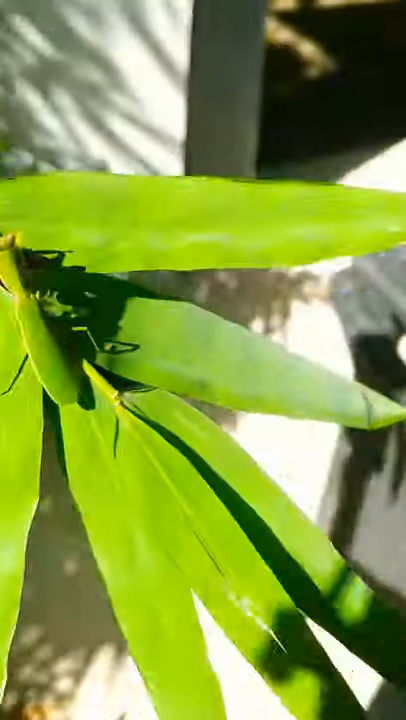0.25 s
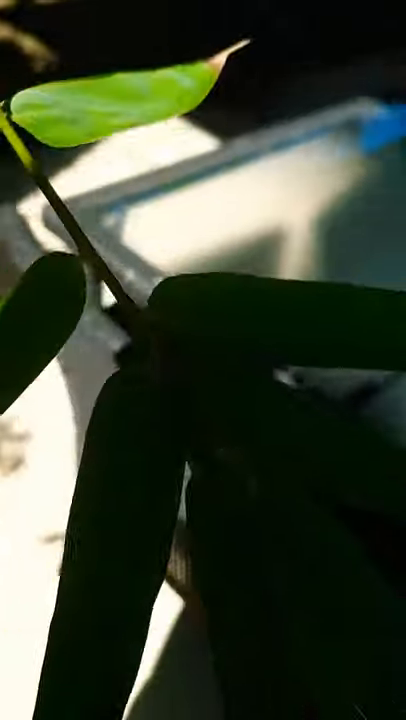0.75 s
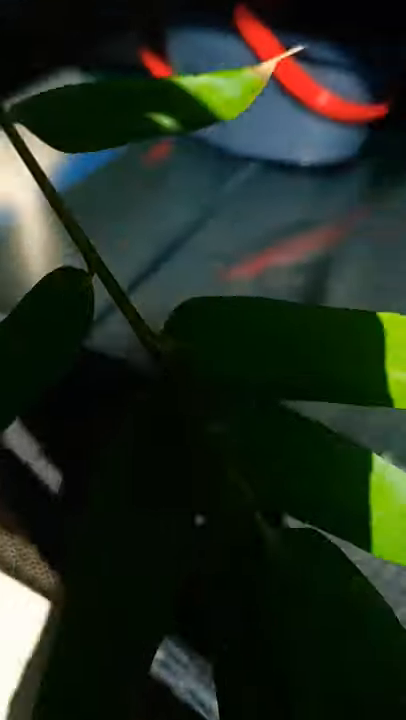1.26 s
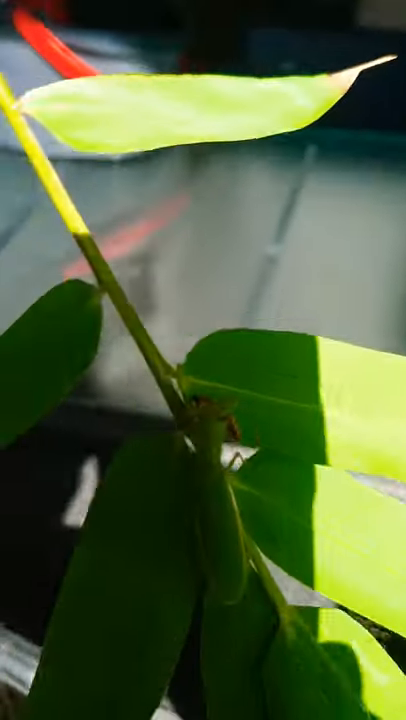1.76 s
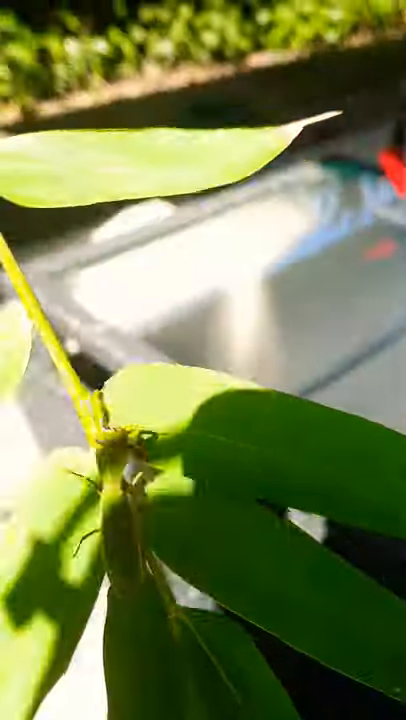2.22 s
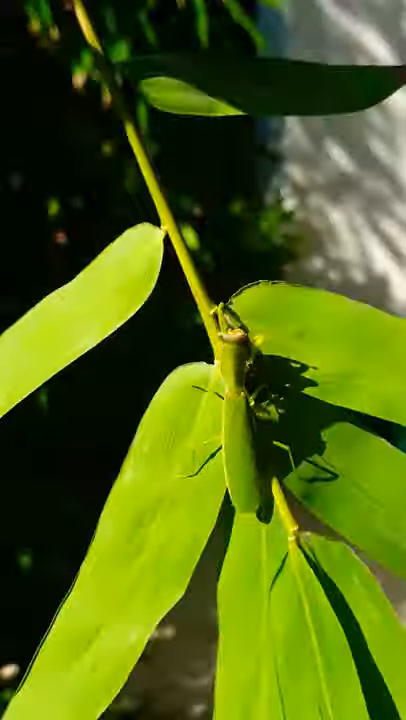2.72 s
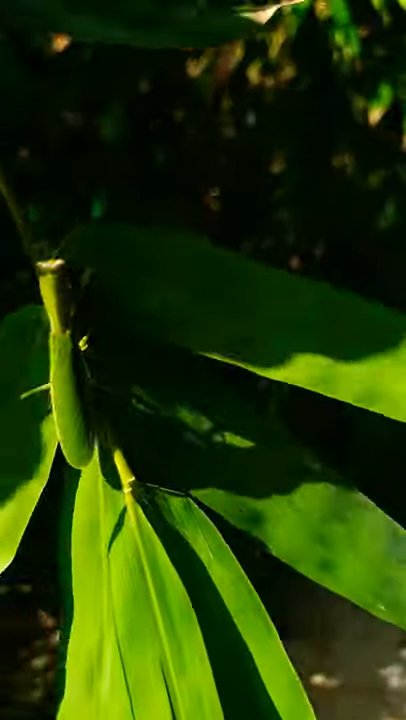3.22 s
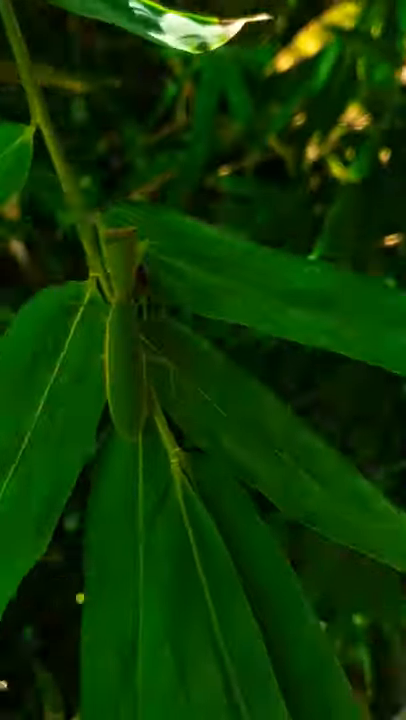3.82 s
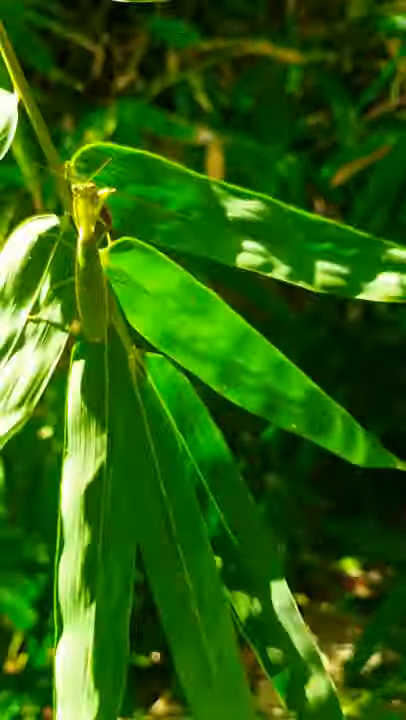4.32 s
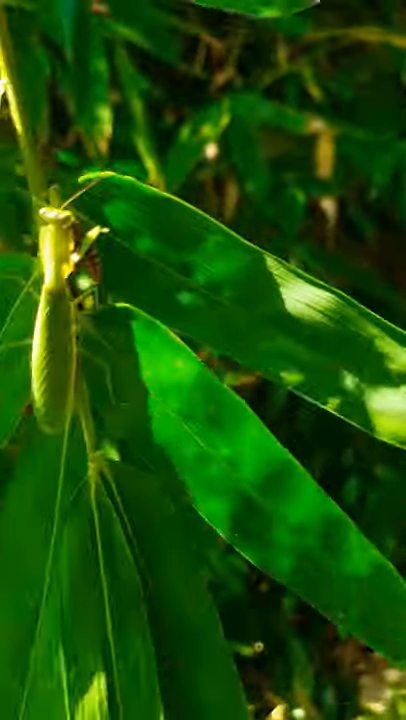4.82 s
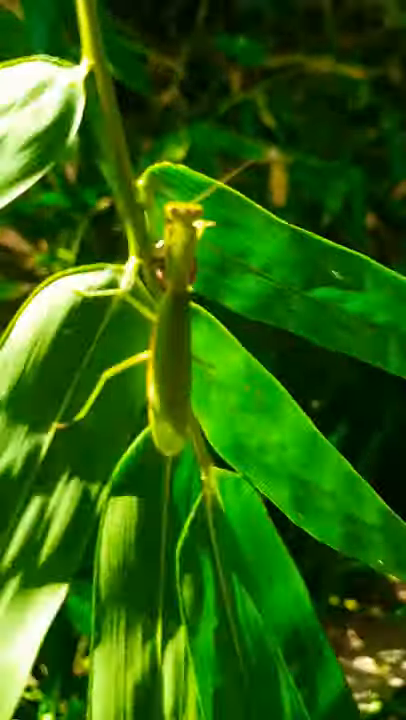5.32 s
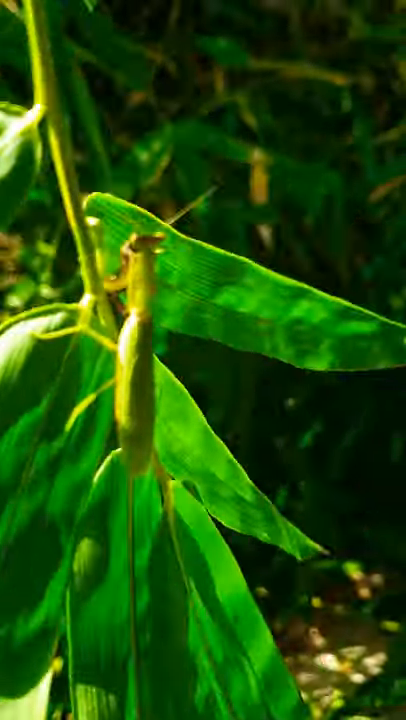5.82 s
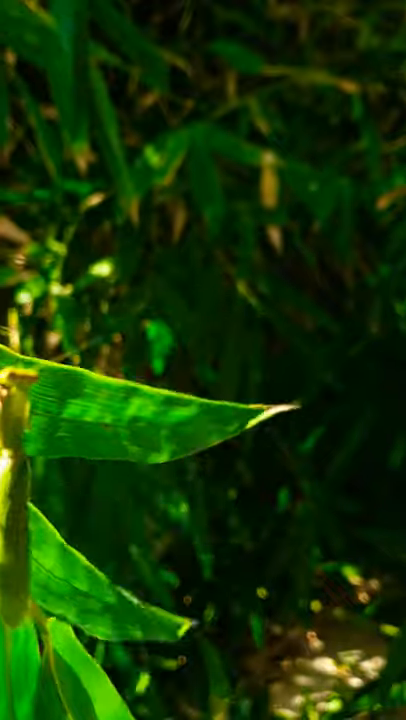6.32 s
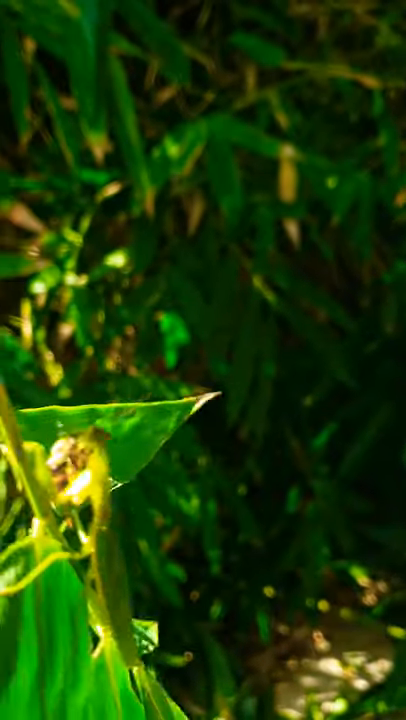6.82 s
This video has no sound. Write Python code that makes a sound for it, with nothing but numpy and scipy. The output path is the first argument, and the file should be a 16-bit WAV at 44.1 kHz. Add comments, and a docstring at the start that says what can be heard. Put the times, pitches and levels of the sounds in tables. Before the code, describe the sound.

Bamboo leaves rustle in gusts close to the microphone, mostly on the right, a bright, fluttering hiss with fine crackle and occasional swishes. The rustle swells at about 0.3 seconds, then in waves from 1 to 2.7 seconds. A sharp leaf flick and light stem knocks come around 1.2 seconds, with another knock at 1.8. From about 2.8 to 3.8 seconds there is a lull with small ticks. A crisp snap at 3.9 and soft knocks at 4.1 lead into another strong gust, peaking near 4.7. The leaves then settle, stirring lightly around 5.5 and growing very quiet by 6.5. One small dry tap on the device sounds on the left at 6.7. Throughout, wind rumbles softly on the microphone, puffing on the left near 2.6 and 3.6 seconds, while a faint, distant motor hums under the garden air.

```python
"""Bamboo leaves in gusts of wind

Gusts push bamboo leaves across each other beside a hand-held phone, nearest its right port.
Stick-slip friction makes the hiss; single blades swish, leaf tips flick and stems knock and ring.
Turbulence rumbles and puffs on the ports, and the case is tapped once.
A faint far-off motor hums under the garden air."""
import sys
import numpy as np
from scipy import signal
from scipy.fft import rfft, irfft, next_fast_len
from scipy.io import wavfile
from scipy.ndimage import map_coordinates

SR = 44100
rng = np.random.default_rng(int(sys.argv[2]) if len(sys.argv) > 2 else 0)


def to_wav(s):
    """Save 16-bit WAV."""
    ch = np.atleast_2d(s).T  # columns
    pcm = np.round(np.clip(ch, -1, 1) * 32767)  # PCM
    wavfile.write(sys.argv[1], SR, pcm.astype(np.int16))


N = 311257
T = np.arange(N) / SR


def leaves(left_lift_db=6):
    """Stick-slip friction: dense slips between blades merge into a fluttering hiss with sparse crackle."""
    # blade resonances: (frequency [Hz], bandwidth [Hz], relative level [dB])
    blade_modes = [(1888, 560, -15), (3383, 1040, -18.5), (5373, 330, -14.5), (7290, 550, -15.5),
                   (8820, 1150, -14.5)]
    level_db, body_db = gusts()
    flutter = undb(0.7 * walk(25.195) + 0.68 * walk(170))
    # in the lulls single slips stand out of the hiss
    crackle_db = -14.5 - 0.21 * (np.maximum(level_db, -52) + 43)
    crackle = undb(crackle_db) * band(slips(260, 2.2), 5800, "high", order=1)
    direct, scattered = (slips(16000, 1.87) + crackle for _ in range(2))
    for hz, width, db in blade_modes:
        strength = undb(db + 3.15 * walk(9))  # modes come and go as the blades bend
        direct = direct + strength * bend(resonance(rng.standard_normal(N), hz, width), hz)
    pair = at_ports(flutter * direct, flutter * scattered)
    # barely moving blades lose their top octave
    dull = np.clip((-50.5 - level_db) / 14, 0, 1)
    pair = pair + dull * (band(pair, 11400, "low", order=1) - pair)
    body, hiss = band(pair, 1487, "low", order=3), band(pair, 2550, "high", order=3)
    body_gain = undb(np.minimum(body_db, -8) + 11)
    pair = (hiss + body * body_gain) / np.std(hiss.mean(0)) * undb(level_db - 0.06)
    pair[0] *= undb(left_lift_db)
    return pair


def gusts(shape=1.83):
    """Incoherent sources add in power: gives the rustle's level and power-weighted low-mid body in dB."""
    # leaves stirring between gusts: (time [s], level [dB], relative body [dB])
    stir = [(0, -39.5, -13.5), (.5, -47.5, -11), (1.38, -52.5, -10.5), (2, -50, -11), (2.8, -51.5, 3),
            (3.4, -56, -11.5), (3.75, -54, -9.5), (4.3, -47, -11.5), (5.1, -53, -7), (6.25, -58.5, -10),
            (6.45, -65.5, -6), (6.62, -62, -7), (6.8, -66, -5), (7.06, -67.5, -4.5)]
    # one spray swept across another: (peak time [s], level [dB], rise [s], fall [s], relative body [dB])
    sweeps = [(0.29, -32.5, 0.21, 0.16, -13.5), (0.64, -44.5, .08, 0.22, -12.5),
              (1.02, -39, 0.13, 0.16, -10), (1.24, -35.5, 0.14, 0.063, -11.5),
              (1.62, -33.5, 0.097, 0.2, -13.5), (1.82, -31.5, 0.13, 0.083, -16),
              (2.38, -33.5, 0.34, 0.3, -11.5), (3.0, -49, .07, 0.15, -9), (3.25, -50, 0.078, 0.083, -10),
              (3.57, -52, 0.15, 0.14, -8), (3.96, -40.5, .13, 0.15, -12), (4.13, -39, 0.095, 0.057, -13.5),
              (4.52, -33.5, 0.1, .12, -11.5), (4.751, -31, 0.23, 0.21, -14), (5.42, -49, 0.2, 0.2, -10),
              (5.66, -47, 0.052, 0.062, -9.5), (5.93, -53.5, 0.15, .2, -13.5)]
    stir_db, stir_body_db = curves(stir)
    power = undb(stir_db) ** 2
    body = power * stir_body_db
    for s, db, rise, fall, body_db in sweeps:
        away = np.maximum((s - T) / rise, (T - s) / fall)
        sweep = (undb(db) * np.exp(-away ** shape)) ** 2  # a shape of 2 is Gaussian
        power, body = power + sweep, body + sweep * body_db
    return 10 * np.log10(power), body / power


def slips(per_s, spread_db):
    """Shot noise: tiny stick-slip clicks at random moments, most faint and a few strong."""
    strength = undb(spread_db * np.minimum(rng.exponential(size=N), 6))
    return unit((rng.random(N) < per_s / SR) * strength * rng.choice([-1, 1], N))


def bend(x, hz, swing=.03):
    """Frequency modulation: a bending blade slides its resonance up and down by a few percent."""
    analytic = signal.hilbert(x, next_fast_len(N))[:N]
    phase = 2 * np.pi * np.cumsum(swing * hz * walk(5)) / SR
    return np.real(analytic * np.exp(1j * phase))


def swishes(left_db=-16):
    """Friction-driven resonance: one blade drawn along another swells and fades with a hollow tone."""
    # strokes: (time [s], half length [s], frequency [Hz], nominal bandwidth [Hz], relative level [dB])
    strokes = [(0.245, 0.11, 2050, 700, -46.5), (.35, 0.08, 9100, 1200, -41.5),
               (1.016, 0.092, 8550, 900, -45.5), (1.743, 0.16, 1900, 700, -46),
               (2.003, 0.017, 2740, 500, -49), (2.087, 0.024, 1820, 500, -45.5),
               (2.413, 0.28, 8400, 1100, -41.5), (3.867, .003, 3620, 900, -38),
               (4.05, 0.052, 5580, 900, -40.5), (4.057, 0.04, 7400, 900, -43),
               (4.684, 0.22, 1620, 560, -41), (4.6, 0.16, 3550, 450, -46.5), (4.73, 0.14, 7200, 902, -44),
               (5.935, 0.0092, 5460, 3800, -47)]
    out = np.zeros(N)
    for s, length, hz, width, db in strokes:
        stage_width = 1.36 * width  # two stages in series narrow the peak
        voice = resonance(resonance(rng.standard_normal(N), hz, stage_width), hz, stage_width)
        out += undb(db + 4.5) * np.exp(-((T - s) / length) ** 2) * voice
    return np.array([undb(left_db) * late(out), out])


def flicks(rise_s=.0018, tail_s=0.03, tail_db=-16, gain_db=-3.0, ring_db=-5, left_db=-22):
    """Elastic release: a caught leaf tip lets go; a burst of slips rings the blade, with a papery tail."""
    # tip releases: (time [s], relative level [dB], relative body [dB], resonance [Hz])
    releases = [(1.1867, -21.5, -12.5, 8700), (1.2694, -30.5, -21, 8980), (1.2824, -31, -12, 8580),
                (2.7676, -27, -29, 12400), (2.9921, -35, -5, 9300), (3.1383, -37, -15, 9510),
                (3.2216, -37, -15, 7820), (3.2894, -38, -10, 9080), (3.8631, -31, -14, 8510),
                (3.931, -18.5, -21, 12130), (4.3166, -31.5, -33, 9860), (5.2056, -32, -33, 9400),
                (5.9299, -37, -12, 7360), (6.0506, -38, -21.5, 8170), (6.2362, -43, -9, 9850),
                (6.6159, -45.5, -17, 8320)]
    out = np.zeros((2, N))
    t = T[:SR // 10]
    envelope = t / rise_s * np.exp(1 - t / rise_s) + undb(tail_db) * np.exp(-t / tail_s)
    for s, db, body_db, hz in releases:
        burst = rng.standard_normal((2, len(t)))
        snap = unit(band(burst, [6800, 14000], "band")) + undb(ring_db) * resonance(burst, hz, 700)
        body = undb(body_db + 8) * unit(band(burst, [900, 4200], "band"))
        sound = unit(snap + body) * envelope * undb(db + gain_db + np.array([[left_db], [0]]))
        for port, heard in zip(out, sound):
            add(port, s, heard)
    return out


def knocks(rattle_s=0.028, rattle_db=-21, left_db=-4, width_share=0.55):
    """Modal ringing: one stem bumps another and chatters briefly; the spot struck favours some modes."""
    # stem modes: (frequency [Hz], relative level [dB], time to decay by 60 dB [s])
    stem_modes = [(135, -14, 0.053), (192, 0, 0.07), (246, -8, 0.056), (297, 0, 0.076), (436, -1, 0.082),
                  (577, 3, 0.04), (844, 5.5, 0.036), (950, 5, 0.022)]
    # stem impacts: (time [s], peak level [dB], favoured frequency [Hz])
    impacts = [(0.092, -37.5, 306), (1.187, -24.5, 890), (1.19, -32.5, 204), (1.282, -29, 640),
               (1.291, -39.5, 180), (1.84, -29, 432), (2.993, -38, 1100), (4.103, -29, 244),
               (4.137, -35, 329)]
    out, t = np.zeros(N), T[:SR // 4]
    ring = sum(undb(db) * np.sin(2 * np.pi * hz * t) * np.exp(-np.log(1000) * t / t60)
               for hz, db, t60 in stem_modes)
    for s, db, hz in impacts:
        force = undb(rattle_db) * rng.standard_normal(len(t)) * np.exp(-t / rattle_s)
        force *= rng.random(len(t)) < .1  # intermittent contact
        force[0] = 1  # the first blow
        sound = resonance(signal.fftconvolve(force, ring)[:len(t)], hz, width_share * hz)
        add(out, s, undb(db) * sound / np.abs(sound).max())
    return np.array([undb(left_db) * late(out), out])


def wind(own_db=-10):
    """Turbulent pressure: a rumble shared by both ports, a little of each one's own, eddies on the left."""
    # strength of the rumble: (time [s], relative level [dB])
    rumble_levels = [(0, -55), (.6, -67), (.86, -54.5), (1.25, -60), (1.45, -58), (1.72, -63), (1.85, -56),
                     (2.05, -58), (2.7, -52), (3.05, -61.5), (3.95, -57.5), (4.28, -61), (4.65, -62),
                     (4.87, -53), (5.2, -62), (5.42, -54.5), (5.9, -63.5), (7.06, -69)]
    # eddies striking the left port: (time [s], relative level [dB], half length [s])
    puffs = [(0.414, -46, 0.015), (2.578, -31, 0.011), (2.70, -40, 0.023), (3.021, -46.5, 0.05),
             (3.336, -47, 0.036), (3.43, -47, 0.027), (3.586, -39, .025)]
    # turbulence spectrum: (frequency [Hz], relative level [dB])
    spectrum = [(15, -46), (30, -17), (54, 3.0), (70, -0.5), (95, -3.5), (130, -17.5), (250, -12.5),
                (900, -48)]
    level_db, = curves(rumble_levels)
    noise = rng.standard_normal(N) + undb(own_db) * rng.standard_normal((2, N))
    rumble = unit(colour(noise, spectrum)) * undb(level_db + 4.0)
    eddies = sum(undb(db) * np.exp(-((T - s) / length) ** 2) for s, db, length in puffs)
    rumble[0] += 0.86 * eddies * unit(band(rng.standard_normal(N), [36, 75], "band"))
    return band(rumble, 32, "high", order=3)


def case_tap(at_s=6.7328, decay_s=0.0002, left_db=-26, right_db=-44):
    """Impulsive contact: one small dry tap on the case near the left port."""
    out = np.zeros(N)
    add(out, at_s, np.exp(-T[:SR // 100] / decay_s))
    out = band(out, [60, 5500], "band")
    return undb([[left_db], [right_db]]) * out / out.max()


def motor(drone_ratio=0.309):
    """Rotational tones: one speed sets the pitch of both the far motor's hum and its low drone."""
    # hum, speeding up and then holding: (time [s], pitch [Hz], relative level [dB])
    run = [(0, 220, -71), (2.5, 227, -67.5), (3.8, 236, -62), (4.5, 245.6, -67), (5.2, 252.9, -65.5),
           (7.06, 252.3, -66.5)]
    # strength of the drone: (time [s], relative level [dB])
    drone_levels = [(0, -66), (.75, -59), (1, -51), (1.35, -57), (2.02, -60), (2.22, -48.5), (2.75, -48),
                    (3.1, -65), (4.2, -63), (4.6, -52.5), (5.0, -53.5), (5.2, -60), (5.65, -52.5),
                    (5.9, -57), (6.33, -55), (6.5, -64), (7.06, -68)]
    hz, hum_db = curves(run)
    drone_db, = curves(drone_levels)
    return (hum(hz, hum_db, waver_db=2.5, drift=0.01, rough_db=2.5)
            + hum(drone_ratio * hz, drone_db, waver_db=1.5, drift=0.0256, rough_db=3.0))


def hum(hz, db, waver_db, drift, rough_db):
    """Random modulation: a distant tone wavers in pitch and strength on the way."""
    phase = 2 * np.pi * np.cumsum(hz * (1 + drift * walk(7))) / SR
    return np.sqrt(2) * np.sin(phase) * undb(db - 1.5 + waver_db * walk(7.4) + rough_db * walk(30))


def air(level_db=-63):
    """Ambient noise: an even outdoor background, partly coherent between the ports, weaker on the left."""
    # still garden air: (frequency [Hz], relative spectral density [dB])
    spectrum = [(100, -3.5), (180, -0.5), (300, -8), (600, -13.5), (1500, -20.5), (3400, -17.5),
                (5000, -22.5), (9300, -27), (11000, -32), (12500, -31), (15000, -42)]
    right, own = rng.standard_normal((2, N))
    left = 0.45 * band(late(right), 870, "low", order=1) + 0.18 * own
    pair = band(colour(np.array([left, right]), spectrum), 102, "high")
    return pair / np.std(pair.mean(0)) * undb(level_db + 0.41 * walk(3.14))


def at_ports(direct, scattered, shared_below_hz=1700):
    """Acoustic shadow: the left port shares the lows with the right; its treble comes by other paths."""
    # colour of the leaves at the near (right) port: (frequency [Hz], gain [dB])
    near_response = [(100, -14.5), (350, -8), (1150, -6.5), (1600, -4), (2550, -5), (3450, -1),
                     (4300, -5.5), (6200, -6), (7300, -3), (9900, -2.5), (11100, -12), (12400, -1.5),
                     (13500, -7.5), (15600, -13)]
    # colour of the leaves at the shaded (left) port: (frequency [Hz], gain [dB])
    far_response = [(100, -31.5), (350, -18), (1500, -21), (5800, -20), (6800, -24), (7400, -43),
                    (8200, -30.5), (15500, -29)]
    left = band(late(direct), shared_below_hz, "low", order=1) * 0.34 + band(scattered, 380, "high", order=1)
    return np.array([colour(left, far_response), colour(direct, near_response)])


def late(x, lag_s=0.000427):
    """Propagation delay: the extra travel time to the left port."""
    return np.interp(T - lag_s, T, x, left=0)


def resonance(x, hz, width):
    """Second-order resonator: one peak, scaled to rms 1."""
    return unit(signal.lfilter(*signal.iirpeak(hz, hz / width, fs=SR), x))


def colour(x, points):
    """Minimum-phase filter through (frequency [Hz], gain [dB]) points, built from the folded cepstrum."""
    hz, db = np.transpose(points)
    size = next_fast_len(N + 8192) // 2 * 2
    f = np.maximum(np.arange(size // 2 + 1) * SR / size, 1)
    gain = undb(np.interp(np.log(f), np.log(hz), db))
    cepstrum = irfft(np.log(gain))
    cepstrum[1:size // 2] *= 2
    cepstrum[size // 2 + 1:] = 0
    return irfft(rfft(x, size) * np.exp(rfft(cepstrum)))[..., :N]


def band(x, hz, kind, order=2):
    """Butterworth filter."""
    return signal.sosfilt(signal.butter(order, hz, kind, fs=SR, output="sos"), x)


def walk(rate):
    """Interpolated noise with rate new values a second and a spread near 1."""
    return map_coordinates(rng.standard_normal(4096), [T * rate], order=1, mode="wrap") * np.sqrt(3 / 2)


def curves(table):
    """Linear interpolation of each column of a timed table, sample by sample."""
    s, *columns = np.transpose(table)
    return [np.interp(T, s, c) for c in columns]


def add(track, s, sound):
    """Superpose a short sound at time s."""
    i = int(s * SR)
    track[i:i + len(sound)] += sound[:N - i]


def undb(db):
    """Decibels to amplitude ratio."""
    return 10 ** (np.asarray(db) / 20)


def unit(x):
    """Normalise to rms 1."""
    return x / np.sqrt(np.mean(x ** 2))


def scene():
    """Superposition: leaves and stems up close, wind and a tap at the ports, a far motor and air behind."""
    return leaves() + swishes() + flicks() + knocks() + wind() + case_tap() + motor() + air()


def record(dry, top_hz=15800):
    """Band limiting: the phone's low-pass filter cuts the top steeply."""
    return signal.sosfilt(signal.ellip(12, .2, 80, top_hz, fs=SR, output="sos"), dry)


dry = scene()
out = record(dry)
to_wav(out)
```